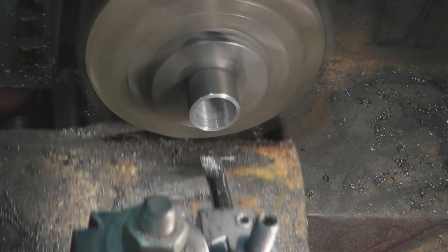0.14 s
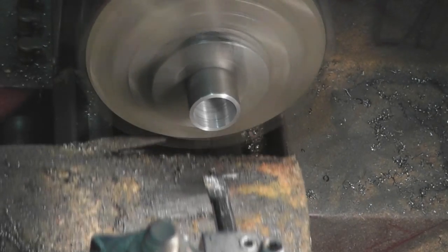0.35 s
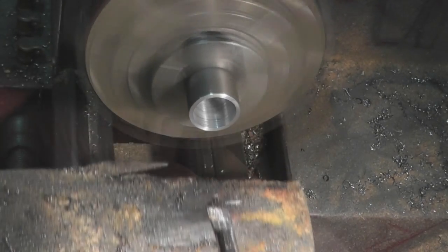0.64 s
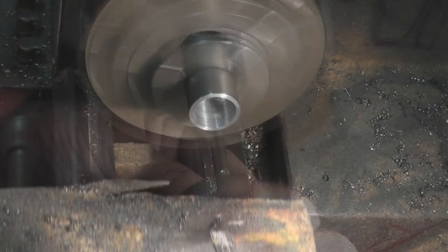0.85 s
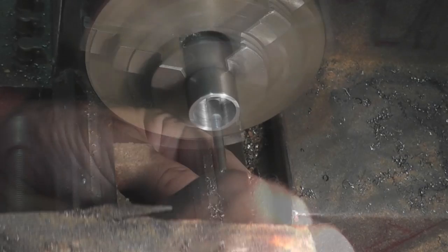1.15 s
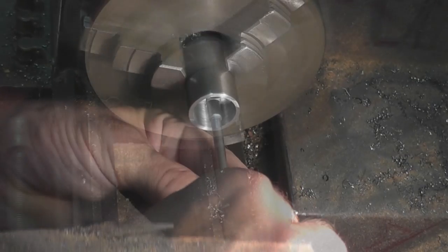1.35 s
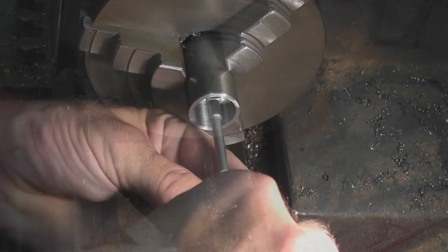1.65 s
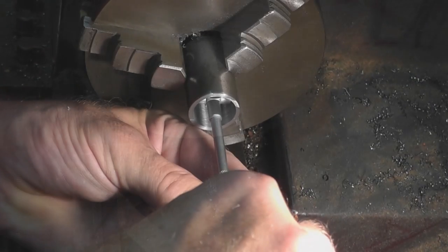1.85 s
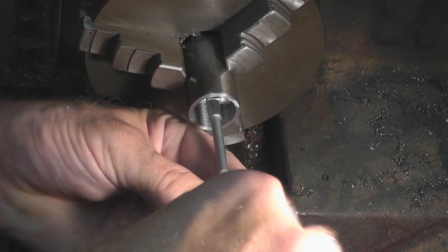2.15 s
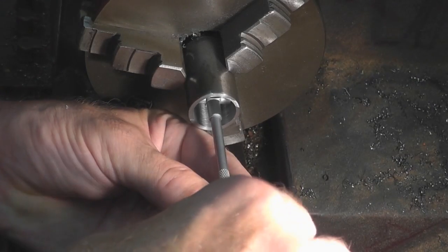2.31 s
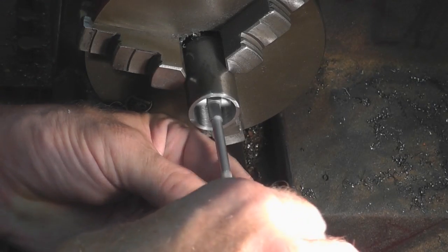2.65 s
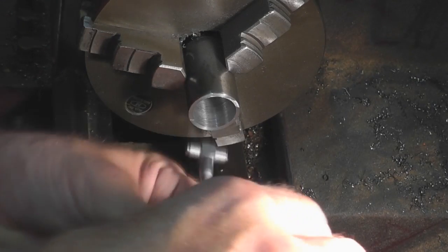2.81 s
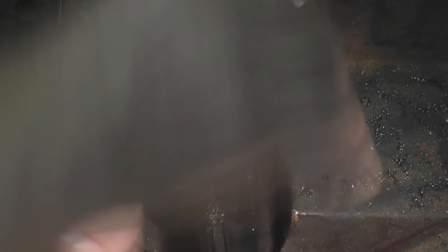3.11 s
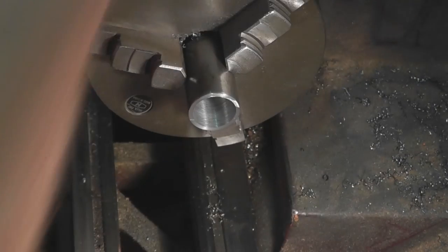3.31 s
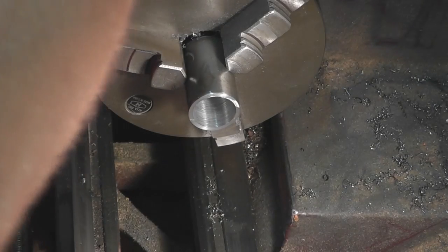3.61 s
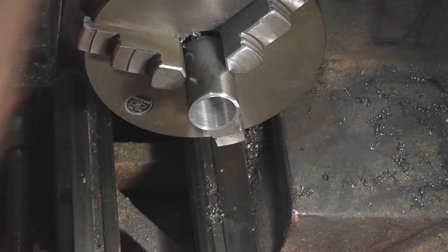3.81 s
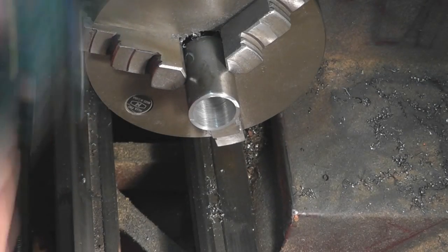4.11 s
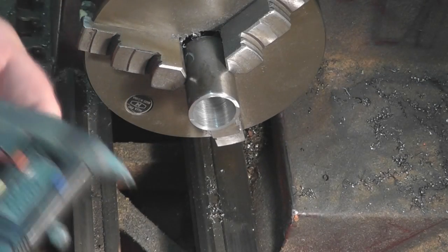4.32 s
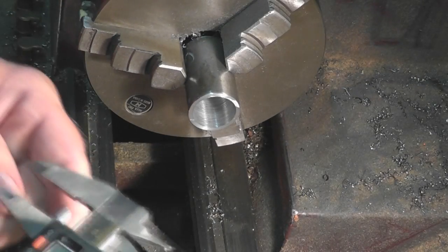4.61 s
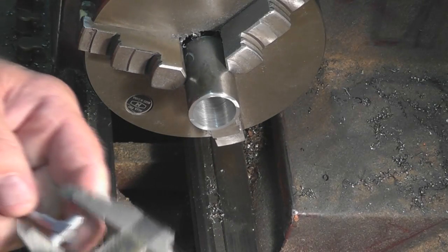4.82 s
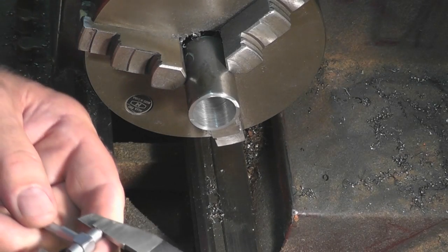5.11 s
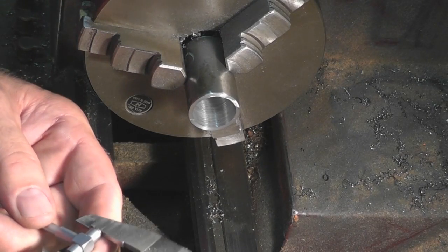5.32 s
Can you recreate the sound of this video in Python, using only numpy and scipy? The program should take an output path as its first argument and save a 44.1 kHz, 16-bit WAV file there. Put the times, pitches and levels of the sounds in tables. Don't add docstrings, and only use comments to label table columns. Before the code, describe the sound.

Close stereo capture in a small workshop: a lathe's grinding gear rumble and bearing hiss sink to a stop over two seconds, with dense metallic ticks, shudders and a sharp clunk near one second. Faint gauge taps follow, then a loud clank on sheet steel with a short boomy rattle, and a few crisp clicks over a low fan hum.

```python
import sys
import numpy as np
from scipy import signal
from scipy.fft import rfft, irfft, next_fast_len
from scipy.io import wavfile
from scipy.ndimage import uniform_filter1d, map_coordinates

SR = 44100
rng = np.random.default_rng(int(sys.argv[2]) if len(sys.argv) > 2 else 0)


def natural_amplitude(level_db):
    exponent = np.asarray(level_db, float) / 20
    return 10 ** exponent


def to_wav(sig):
    pcm = np.clip(np.atleast_2d(sig), -1, 1) * 32767
    pcm = np.round(pcm).astype(np.int16)
    wavfile.write(sys.argv[1], SR, pcm.T)


N = 240596

# centre in Hz, width in Hz, lift in dB.
CASTING = [(379.5, 21, 5.5), (577, 10.7, 11.5), (894, 3.1, 11.5), (1077, 10, 13), (1370, 200, 3.5),
           (2204, 15, 9), (2880, 25, 10), (3650, 150, 4), (5110, 220, 1.5), (6300, 460, 2.5)]
# frequency in Hz, likeness from 0 to 1.
ALIKE = [(60, 0.092), (150, 0.73), (380, 0.79), (950, 0.6), (2380, 0.77), (5980, 1), (13000, 0.05)]
# frequency in Hz, left over right in dB.
LEAN = [(60, -8), (240, -5), (950, -0.5), (3770, -0.5), (15000, 0.5)]


def unit(x):
    return x / np.sqrt(np.mean(x ** 2) + 1e-20)


def along(points, hz):
    f, v = np.transpose(points)
    return np.interp(np.log(hz + 1), np.log(f + 1), v)


def wobble(rate):
    knots = rng.standard_normal(int(N * rate / SR) + 4)
    return map_coordinates(knots, [np.arange(N) * rate / SR])


def filtered(x, response):
    m = next_fast_len(x.shape[-1] + 8192)
    hz = np.fft.rfftfreq(m, 1 / SR)
    return irfft(rfft(x, m) * response(hz), m)[..., :x.shape[-1]]


def stereo(pair, gain, alike=ALIKE, lean=LEAN):
    m = next_fast_len(pair.shape[1])
    hz = np.fft.rfftfreq(m, 1 / SR)
    turn = np.arccos(np.clip(along(alike, hz), -1, 1)) / 2
    mid, side = rfft(pair, m) * gain(hz) * [np.cos(turn), np.sin(turn)]
    balance = natural_amplitude(np.outer([.5, -.5], along(lean, hz)))
    both = irfft([mid + side, mid - side] * balance, m)[:, :pair.shape[1]]
    return both / np.std(both.mean(0))


def lifted(spectrum, peaks):
    def gain(hz):
        lift_db = sum(db / (1 + (2 * (hz - c) / w) ** 2) for c, w, db in peaks)
        return natural_amplitude(along(spectrum, hz) + lift_db)
    return gain


def ring(modes, crack_db, crack_hz=(2500, 6000), crack_t60=.02, attack=.0005, order=1, wander_hz=60):
    longest_s = max(crack_t60, *np.transpose(modes)[2])
    t = np.arange(round(SR * min(1 / 3, longest_s))) / SR
    drift = np.cumsum(rng.standard_normal((len(modes), len(t))), 1) * np.sqrt(2 * np.pi * wander_hz / SR)
    drift = uniform_filter1d(drift, size=40)
    tones = 0
    for (hz, db, t60), slip in zip(modes, drift):
        decay = natural_amplitude(db + rng.normal(0, 1.5) - 60 * t / t60)
        tones = tones + decay * np.sin(2 * np.pi * hz * t + slip)
    crack = rng.standard_normal(len(t)) * natural_amplitude(-60 * t / crack_t60)
    crack = signal.sosfilt(signal.butter(7, crack_hz[0], "high", fs=SR, output="sos"), crack)
    crack = signal.sosfilt(signal.butter(order, crack_hz[1], fs=SR, output="sos"), crack)
    blow = tones * (1 - np.exp(-t / attack)) + natural_amplitude(crack_db) * crack
    return blow / np.abs(blow).max()


def add(track, s, sound):
    part = track[..., round(s * SR):][..., :sound.shape[-1]]
    part += sound[..., :part.shape[-1]]


def rub(rise, hold, t60, db, peaks, broad_db):
    t = np.arange(SR // 2) / SR
    lowest_hz, highest_hz = peaks[0][0], peaks[-1][0]

    def body(f):
        modes = sum(natural_amplitude(g) * w * f / np.abs(c * c - f * f + 1j * f * w) for c, w, g in peaks)
        broad = natural_amplitude(broad_db) * (f > lowest_hz / 2)
        return (modes + broad) / (1 + (f / (1.6 * highest_hz)) ** 2)

    noise = stereo(rng.standard_normal((2, len(t))), body)
    decay_db = -60 * np.clip(t - rise - hold, 0, None) / t60
    return noise * np.clip(t / rise, 0, 1) * natural_amplitude(db + decay_db)


def follows(over_db, falls):
    # time in seconds, drive in dB.
    coasting = [(0.0, -30), (0.3, -30.5), (0.8, -34.5), (1.11, -35.5), (1.25, -38), (1.62, -43),
                (1.77, -46), (1.9, -45), (2.0, -49), (2.11, -57.5), (2.3, -69)]
    full_db = -30
    s, drive_db = np.transpose(coasting)
    lost_db = np.interp(np.arange(N) / SR, s, drive_db - full_db, right=-100)
    return natural_amplitude(full_db + over_db + falls * lost_db)


def spindle():
    # frequency in Hz, density in dB per Hz.
    gear_colour = [(35, -70), (60, -32), (81, -26), (216, -11), (247, -1.5), (340, -9.5), (380, -5),
                   (641, -14), (900, -12.5), (1170, -16.5), (1980, -120)]
    # frequency in Hz, density in dB per Hz.
    whirr_colour = [(240, -48), (400, -5.5), (585, -10.5), (647, -9.5), (847, -0.5), (1140, -6.5),
                    (1420, 1), (1780, -8), (3000, -15.5), (3900, -74), (6600, -120)]
    # frequency in Hz, density in dB per Hz.
    hiss_colour = [(1180, -31), (2000, -1), (3740, -7.5), (4530, -12.5), (5160, -7), (5440, -14),
                   (6640, -13), (14400, -26), (16000, -34.5)]
    # frequency in Hz, density in dB per Hz.
    slow_hiss_colour = [(1180, -35), (2000, 2), (2260, 0), (2500, -11), (3770, -4), (4550, -8), (5600, -13),
                        (6500, -10.5), (7700, -10.5), (8400, -14.5), (14000, -17), (16000, -29)]

    def rough(flicker_db, per_s, colour):
        grit = rng.standard_normal((2, N)) * natural_amplitude(flicker_db * wobble(per_s))
        return stereo(grit, lifted(colour, CASTING))

    slow = np.clip(np.arange(N) / SR / 2.5, 0, 1)
    fast_gears = rough(1.7, 41.42, gear_colour)
    slow_gears = rough(2.2, 30, [(hz * 0.88, db) for hz, db in gear_colour])
    gears = np.sqrt(1 - slow) * fast_gears + np.sqrt(slow) * slow_gears
    whirr = rough(1.9, 59.17, whirr_colour)
    fast_balls = rough(0.71, 89.5, hiss_colour)
    slow_balls = rough(2.9, 65.07, slow_hiss_colour)
    bearings = np.sqrt(1 - slow) * fast_balls + np.sqrt(slow) * slow_balls
    return follows(0, 1.09) * gears + follows(-4, 1.146) * whirr + follows(-7, 1.3) * bearings


def singing():
    # centre in Hz, width in Hz.
    sing_bands = [(5120, 150), (6540, 220)]
    song = np.zeros(N)
    for c, w in sing_bands:
        band = filtered(rng.standard_normal(N), lambda hz: 1 / (1 + (2 * (hz - c) / w) ** 2))
        song += natural_amplitude(5.5 * wobble(12)) * unit(band)
    return follows(-26, 1.15) * song


def meshing():
    # share of the tooth rate, level in dB over the drive.
    gear_pairs = [(1, -12), (.62, -15)]
    start_hz, sag_hz_per_s, lowest_hz = 288, 97, 165
    tooth_hz = np.clip(start_hz - sag_hz_per_s * np.arange(N) / SR, 0, None)
    tones = np.zeros(N)
    for share, db in gear_pairs:
        flicker = natural_amplitude(db + 5 * wobble(11)) * np.sqrt(2)
        hz = share * tooth_hz + 14 * wobble(18)
        tones += flicker * np.sin(2 * np.pi * np.cumsum(hz) / SR)
    tones = filtered(tones, lambda f: 1 / (1 + (lowest_hz / (f + 1)) ** 6))
    return follows(0, 0.96) * tones * natural_amplitude([[-2], [2]])


def chips():
    # frequency in Hz, density in dB per Hz.
    chip_colour = [(500, -49), (1500, 8), (3600, -1.5), (6500, -0.5), (12000, -25), (16000, -46)]
    per_s, scatter_db, t60 = 220, 3, .01
    strikes = (rng.random(N) < per_s / SR) * natural_amplitude(scatter_db * rng.standard_normal(N))
    decay = natural_amplitude(-60 * np.arange(SR // 20) / SR / t60)
    bursts = signal.fftconvolve(strikes, decay)[:N]
    noise = stereo(rng.standard_normal((2, N)), lifted(chip_colour, CASTING))
    return follows(-15, 1.3) * unit(bursts) * noise


def workshop():
    # frequency in Hz, density in dB per Hz.
    air_colour = [(13, -39), (22, -22), (98, -2.5), (152, -5), (190, -3.5), (389, -10), (423, -11.5),
                  (573, -9.5), (676, -13), (916, -15.5), (1020, -15.5), (1930, -28), (2410, -23.5),
                  (2620, -27.5), (16200, -35.5)]
    # centre in Hz, width in Hz, lift in dB.
    air_peaks = [(94.5, 18, 2), (391, 55, 7.5), (889, 13, 10.5), (1780, 70, -22), (1852, 304, 13.5),
                 (2600, 150, 5), (2365, 70, -24), (3085, 70, -22)]
    # frequency in Hz, likeness from 0 to 1.
    air_alike = [(60, 0.9), (150, 0.09), (380, 0.19), (950, 0.23), (2380, 0.77), (5980, 0.83),
                 (15000, 0.44)]
    # frequency in Hz, left over right in dB.
    air_lean = [(60, -3.5), (240, -1.5), (950, -0.1), (3770, 0), (15000, 0.96)]
    # frequency in Hz, rms level in dB.
    fan_hum = [(96.9, -63.5)]
    # frequency in Hz, rms level in dB.
    fan_whines = [(1811, -82), (2213, -83), (2278, -79)]
    air = stereo(rng.standard_normal((2, N)), lifted(air_colour, air_peaks), air_alike, air_lean)
    hz, db = fan_hum[0]
    phase = 2 * np.pi * np.cumsum(hz + 4.49 * wobble(12)) / SR
    hum = np.sqrt(2) * natural_amplitude(db + 1.0 + 0.6 * wobble(4.9)) * np.sin(phase)
    t = np.arange(N) / SR
    whine = sum(np.sqrt(2) * natural_amplitude(db) * np.sin(2 * np.pi * hz * t) for hz, db in fan_whines)
    breeze = natural_amplitude(.4 * wobble(3))
    return natural_amplitude(-54.5) * breeze * air + whine + hum * natural_amplitude([[-.8], [.8]])


def thumps():
    # start in seconds, length in seconds, peak in dB, frequency in Hz.
    casting_thumps = [(.002, 0.029, -23, 286), (0.025, 0.025, -22, 258), (.128, 0.013, -27.5, 380),
                      (0.212, 0.016, -28, 300), (0.238, 0.0194, -22, 366), (.4, .017, -25, 346),
                      (0.955, .04, -34, 387), (1.079, .02, -25, 1450), (1.082, 0.046, -24, 570.5),
                      (1.112, 0.026, -30, 473)]
    out, t = np.zeros(N), np.arange(SR // 2) / SR
    for s, length, db, hz in casting_thumps:
        swell = np.sin(np.pi * np.clip(t / length, 0, 1)) ** 2
        add(out, s, natural_amplitude(db) * swell * np.sin(2 * np.pi * hz * t))
    return out


def carriage():
    # start, rise, hold and fall t60 in seconds, rms in dB.
    shudders = [
        (0.004, 0.0043, 0.042, 0.067, -28),
        (0.449, 0.0086, 0.031, 0.25, -27),
        (0.756, 0.038, .02, 0.2, -37.5),
        (1.002, 0.015, 0.088, 0.25, -32),
        (1.077, 0.0026, 0.024, 0.13, -31.5),
        (1.851, 0.011, 0.042, 0.16, -48),
        (1.864, 0.064, .02, .12, -60),
        (2.813, 0.038, 0.018, 0.25, -46),
        (3.886, 0.021, 0.019, 0.17, -37.5),
    ]
    # centre in Hz, width in Hz, level in dB.
    shudder_peaks = [
        [(306, 26, -5), (880, 57, -1), (1560, 59, -4), (2900, 85, -6.5), (3060, 61, -3.5), (3770, 120, -11)],
        [(310, 54, 6), (758, 12, 16), (1214, 10, 9), (1520, 170, -1), (2900, 54, 2), (3750, 300, -20)],
        [(1394, 24, 5), (1490, 180, -22)],
        [(386, 38, -7), (580, 28, -10), (934, 28, -7.5), (1110, 16, -9), (1450, 74, -16), (2430, 39, -19),
         (2780, 130, -14.5)],
        [(35, 29, -19), (555, 30, 2), (740, 23, 2), (960, 46, -14), (1560, 110, -2)],
        [(1000, 60, 12), (1400, 120, 2), (2050, 30, -6), (2900, 150, -3), (3800, 39, -8), (6700, 180, -14)],
        [(2950, 110, -3), (3800, 73, -3), (6500, 110, 0), (7300, 200, -10)],
        [(230, 80, -3), (380, 29, 6.5), (810, 120, -6), (1400, 330, -18), (2030, 40, -10), (2200, 29, -6)],
        [(1404, 51, 6), (1600, 47, -6), (2570, 53, -6), (3100, 130, -3), (3600, 160, -7)],
    ]
    # start, rise, hold and fall t60 in seconds, rms in dB.
    clunk = [
        (1.0737, 0.0081, 0.0064, 0.074, -21),
        (1.087, 0.013, .005, 0.25, -33),
    ]
    # centre in Hz, width in Hz, level in dB.
    clunk_peaks = [(1430, 80, 2), (2980, 200, -2), (4040, 220, 0), (6400, 260, -7), (8050, 200, -1),
                   (8980, 200, -9), (11050, 320, -1), (12600, 200, -14)]
    out = np.zeros((2, N))
    for (s, *shape), peaks in zip(shudders, shudder_peaks):
        add(out, s, rub(*shape, peaks, broad_db=-99))
    for s, *shape in clunk:
        add(out, s, rub(*shape, clunk_peaks, broad_db=-27))
    return out


def rack():
    # start in seconds, peak in dB, ring in Hz, upper ring in Hz.
    dry_ticks = [(0.0438, -21, 3600, 6430), (0.138, -21.5, 3320, 5100), (0.1645, -26.5, 5030, 4860),
                 (0.2014, -28, 3650, 5630), (0.2214, -30, 2970, 5200), (0.2472, -31, 2900, 5270),
                 (0.2754, -19, 3800, 5570), (0.3094, -28, 3500, 4000), (0.3326, -30, 5160, 6500),
                 (0.3608, -22.5, 3640, 7400), (0.379, -20.5, 3600, 4670), (0.5714, -30, 2770, 5140),
                 (0.6047, -26, 3850, 5000), (0.7008, -33, 3900, 4960), (0.734, -31, 3790, 5030),
                 (0.7701, -40, 2820, 6400), (0.8752, -30, 2840, 5700), (0.892, -31, 3660, 5700),
                 (0.926, -31.5, 3760, 5200), (1.2218, -27.5, 3650, 5110), (1.506, -40, 3500, 5050),
                 (1.517, -31, 3370, 4100), (1.8403, -31.5, 3650, 5400), (1.8666, -40, 2950, 4830),
                 (1.9792, -37, 4570, 7500), (1.9943, -35.5, 3410, 4560), (2.0024, -41, 3500, 10800)]
    # start in seconds, peak in dB, ring in Hz, upper ring in Hz.
    pings = [(0.1062, -13, 3600, 5420), (0.113, -22, 3820, 6050), (0.1262, -15, 3880, 7540),
             (1, -29.5, 2900, 3800), (1.1852, -34, 3600, 6360), (1.263, -34, 3480, 6300),
             (1.5796, -38.5, 2900, 4380), (2.0822, -44, 3730, 2230), (2.1966, -48.5, 2700, 2170)]
    tooth_t60, ping_t60 = .022, .03
    out = np.zeros(N)
    for s, db, hz, upper_hz in dry_ticks:
        tooth = [(hz, 0, tooth_t60), (hz * 1.06, -8, tooth_t60), (upper_hz, -5, tooth_t60)]
        add(out, s, natural_amplitude(db) * ring(tooth, 7, (3000, 5000), crack_t60=0.022, order=2))
    for s, db, hz, upper_hz in pings:
        seat = [(hz, 0, ping_t60), (upper_hz, -8, ping_t60)]
        add(out, s, natural_amplitude(db) * ring(seat, -3, (3200, 5000), crack_t60=0.03, attack=.0012, order=2))
    return out


def drone():
    # start in seconds, length in seconds, peak in dB, frequency in Hz.
    tray_drone = (1.005, .082, -21.5, 386)
    out, t = np.zeros(N), np.arange(SR // 2) / SR
    s, length, db, hz = tray_drone
    swell_db = np.where(t < length, 7 * (t / length - 1), -60 * (t - length) / .1)
    tone = np.sin(2 * np.pi * hz * t) + natural_amplitude(-12) * np.sin(2 * np.pi * 2 * hz * t)
    add(out, s, natural_amplitude(db + swell_db) * np.clip(t / .0128, 0, 1) * tone)
    return out


def gauge():
    # start in seconds, peak in dB, bright crack in dB, ring of the work in dB.
    contacts = [(2.589, -42, -8, -8), (2.6695, -41.5, -8, -24), (2.8105, -39, -6, -28),
                (2.8185, -38, -6, -28), (2.83, -39.5, -4, -31), (2.8468, -30.5, -6, -28),
                (2.8562, -29, -2, -25), (2.8634, -27.5, -6, -25), (2.8705, -33, -2, -24)]
    # frequency in Hz, level in dB, t60 in seconds.
    gauge_modes = [(3650, -9, .025), (5050, -3, .016), (5250, 0, .02), (5500, -7, .018), (6200, -8, .05),
                   (9300, -15, .015), (10300, -11, .02), (12900, -18, .012)]
    # frequency in Hz, t60 in seconds.
    work_mode = (2640, 0.09)
    work_hz, work_t60 = work_mode
    out = np.zeros(N)
    for s, db, crack_db, work_db in contacts:
        modes = gauge_modes + [(work_hz, work_db, work_t60)]
        add(out, s, natural_amplitude(db) * ring(modes, crack_db, (3400, 6000), crack_t60=0.024, attack=.0012))
    return out


def slides():
    # start, rise, hold and fall t60 in seconds, rms in dB.
    scrapes = [
        (3.645, .01, .02, .12, -56),
        (4.525, .04, .06, .25, -62.5),
        (4.8, .03, .04, .4, -66),
    ]
    # centre in Hz, width in Hz, level in dB.
    scrape_peaks = [
        [(2550, 61, -16), (3500, 55, -29), (5700, 33, -15), (7840, 50, -8), (9680, 83, -13), (11200, 36, -13)],
        [(3500, 460, -4), (10500, 3200, -4), (13400, 2000, -18)],
        [(3600, 420, 2), (6060, 250, 1), (11400, 2100, 0)],
    ]
    out = np.zeros((2, N))
    for (s, *shape), peaks in zip(scrapes, scrape_peaks):
        add(out, s, rub(*shape, peaks, broad_db=-29))
    return out


def drumming():
    # start in seconds, peak in dB.
    pushes = [(3.655, -42), (3.678, -44), (3.703, -49), (3.7624, -28), (3.772, -23), (3.8021, -6.5),
              (3.897, -24.5), (3.94, -33), (3.968, -36)]
    # frequency in Hz, level in dB, t60 in seconds.
    sheet_bays = [(318.8, -22.5, .6), (349.4, -21.5, .45), (381.9, 0, .17), (412.9, -26.5, .5),
                  (450.9, -8.4, .14)]
    push_s = .0128
    out, t = np.zeros(N), np.arange(SR // 2) / SR
    bays = sum(natural_amplitude(db - 60 * t / t60) * np.cos(2 * np.pi * hz * (t - push_s)) for hz, db, t60 in sheet_bays)
    swing = -bays * np.sin(np.pi / 2 * np.clip(t / push_s, 0, 1)) ** 2
    for s, db in pushes:
        add(out, s, natural_amplitude(db) * swing / np.abs(swing).max())
    return out


def drop():
    # start in seconds, peak in dB.
    landing = [
        (3.7701, -31.5),
        (3.8055, -12.5),
    ]
    # frequency in Hz, level in dB, t60 in seconds.
    edge_modes = [(3430, -8, .09), (5120, -4, .025), (6630, -3, .02), (8200, -3, .02), (9300, -4, .02),
                  (10200, -5, .02)]
    # frequency in Hz, level in dB, t60 in seconds.
    tray_modes = [(954, -8, 0.05), (1570, -3, 0.1), (2220, -4, 0.08), (2600, -3, .08), (2740, -2, .07),
                  (4840, -5, 0.06), (5110, -9, .05), (6360, -8, .05), (10200, -12, .02)]
    # frequency in Hz, level in dB, t60 in seconds.
    sheet_modes = [(521, 0, .36), (242, -4, .35), (592, -8, .3), (192, -14, .3), (720, -5, .2)]
    out = np.zeros(N)
    (touch_s, touch_db), (blow_s, blow_db) = landing
    touch = ring(edge_modes, 7, (1500, 8000), crack_t60=0.018, wander_hz=40)
    blow = ring(tray_modes, 9, (3000, 7000), crack_t60=0.018, attack=.002, wander_hz=40)
    sheet = ring(sheet_modes, crack_db=-55, attack=0.003, wander_hz=0)
    add(out, touch_s, natural_amplitude(touch_db) * touch)
    add(out, blow_s, natural_amplitude(blow_db) * blow)
    add(out, blow_s + .0012, natural_amplitude(-29) * sheet)
    return out


def rattle():
    # start in seconds, rise in seconds, low chatter in dB, brightness in dB.
    thrown = [
        (3.77, 0.00083, -42.5, 6),
        (3.804, 0.0094, -28, -4.5),
        (3.891, 0.02, -39.5, -7.5),
        (3.97, .006, -57.5, -3),
    ]
    # frequency in Hz, density in dB per Hz.
    low_colour = [(260, -20.5), (450, -8), (483, -17), (515, -3), (1210, -5.5), (1420, 1), (1820, -24),
                  (2100, -23), (2730, -54), (4620, -120)]
    # frequency in Hz, density in dB per Hz.
    middle_colour = [(1180, -51), (2000, 0), (2390, -19), (2590, 2), (2960, -14), (3220, -11), (4370, -9.5),
                     (7000, -15), (9100, -48), (15400, -120)]
    # frequency in Hz, density in dB per Hz.
    high_colour = [(4120, -20), (7000, -5), (14700, -14), (15600, -27), (16000, -35)]
    chatter_t60 = (0.4, 0.37, 0.17)
    t = np.arange(N) / SR
    out = np.zeros((2, N))
    for band, (colour, t60) in enumerate(zip((low_colour, middle_colour, high_colour), chatter_t60)):
        power = np.zeros(N)
        for s, rise, low_db, bright_db in thrown:
            db = low_db + (0, -5.5, bright_db)[band]
            decay = natural_amplitude(db - 60 * np.clip(t - s - rise, 0, None) / t60)
            power += (decay * np.clip((t - s) / rise, 0, 1)) ** 2
        chatter = rng.standard_normal((2, N)) * natural_amplitude(2.6 * wobble(90))
        out += np.sqrt(power) * stereo(chatter, lifted(colour, []))
    return out


def caliper():
    # start in seconds, peak in dB, crack over the ring in dB.
    clicks = [(4.4287, -40, 0), (4.5062, -51, 6), (4.6942, -27.5, -1), (4.789, -46, 7), (5.0601, -26, 3),
              (5.182, -53, -3), (5.346, -24.5, 3)]
    # frequency in Hz, level in dB, t60 in seconds.
    jaw_modes = [
        [(2700, 0, .025), (3480, -9, .04), (5100, -8, .016), (6900, -3, .018), (8130, -6, .022)],
        [(3500, -3, .012), (4200, -3, .012), (11000, -3, .01), (13400, -5, .01)],
        [(2620, 0, .02), (3400, 0, .018), (3520, -17, .11), (4380, -5, .018), (4900, -9, .015),
         (9600, -14, .015)],
        [(3600, -2, .012), (10900, -2, .01), (12400, -4, .01)],
        [(3550, -1, .02), (3950, 0, .018), (5000, -5, .018), (5650, -14, .05), (7450, -5, .018),
         (11200, -13, .014)],
        [(3600, 0, .02), (4000, -3, .02)],
        [(3620, -5, .014), (4330, 0, .013), (5400, -9, .014), (1800, -23, .03), (10650, -9, .013)],
    ]
    out = np.zeros(N)
    for (s, db, crack_db), jaws in zip(clicks, jaw_modes):
        click = ring(jaws, crack_db, (3150, 4000), crack_t60=0.019, attack=.0003, wander_hz=110)
        add(out, s, natural_amplitude(db) * click)
    return out


def room(x):
    # frequency in Hz, t60 in seconds.
    room_t60 = [(200, 0.33), (2000, 0.12), (10000, 0.32)]
    out = np.zeros((2, N))
    for start in range(0, N, SR // 4):
        hz, t, z = signal.stft(rng.standard_normal((2, SR // 2)), SR, nperseg=256)
        dull = 1 / (1 + (hz[:, None] / 8000) ** 2)
        decay = natural_amplitude(-60 * t / along(room_t60, hz)[:, None])
        tail = signal.istft(z * dull * decay, SR, nperseg=256)[1]
        tail = tail + 2.0 * tail.mean(0)
        tail = tail / np.linalg.norm(tail[0])
        stretch = x[None, start:start + SR // 4]
        add(out, start / SR + .003, signal.fftconvolve(stretch, tail, axes=1))
    return out


def scene():
    small = rack() + gauge() + caliper()
    heavy = drop()
    boom = thumps() + drone() + drumming()
    hits = small * natural_amplitude([[.3], [-.3]]) + heavy * natural_amplitude([[-.4], [.4]]) + boom * natural_amplitude([[-1.3], [1.3]])
    echo = room(natural_amplitude(-16) * small + natural_amplitude(-5) * heavy + natural_amplitude(-24) * boom)
    lathe = spindle() + singing() + meshing() + chips() + carriage()
    return hits + echo + lathe + slides() + rattle() + workshop()


def roll_off(x):
    return signal.sosfilt(signal.butter(12, 16470, fs=SR, output="sos"), x)


def record(dry):
    limited = filtered(dry, lambda hz: 1 / (1 + (hz / 15750) ** 80))
    return roll_off(limited)


dry = scene()
out = record(dry)
to_wav(out)
```